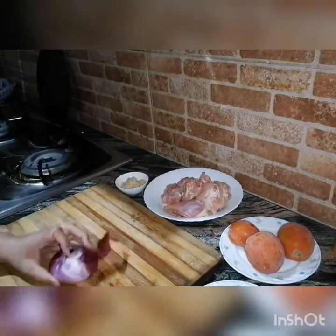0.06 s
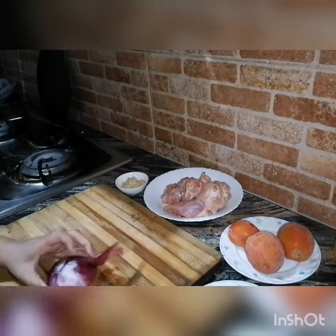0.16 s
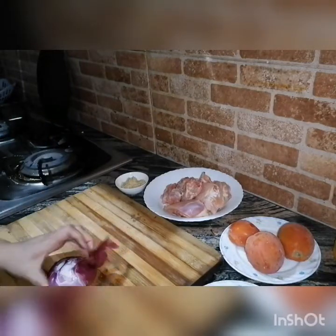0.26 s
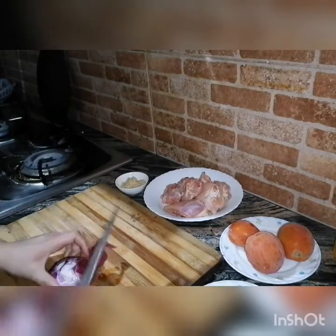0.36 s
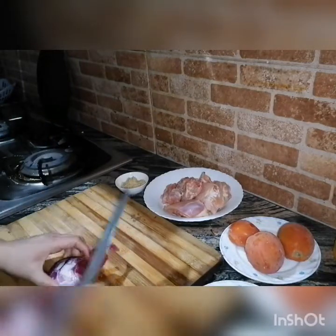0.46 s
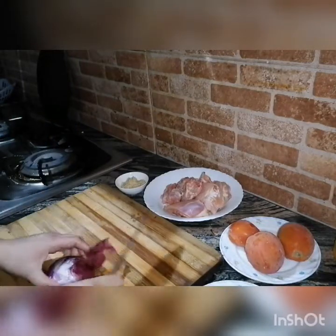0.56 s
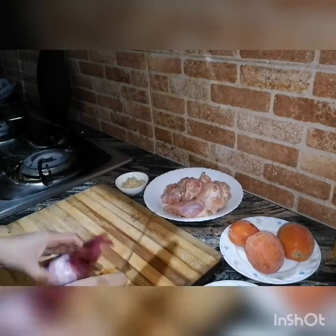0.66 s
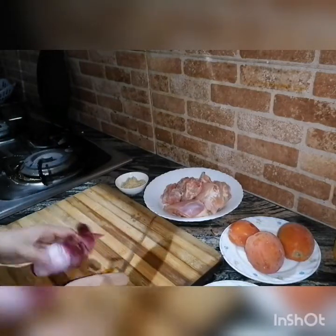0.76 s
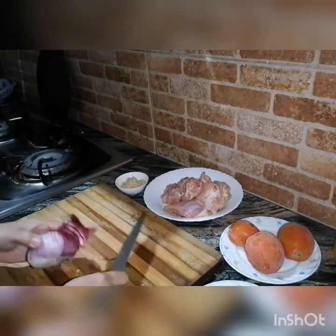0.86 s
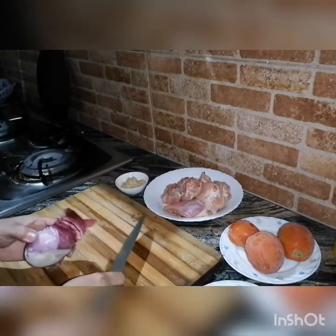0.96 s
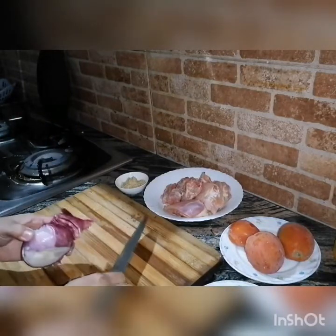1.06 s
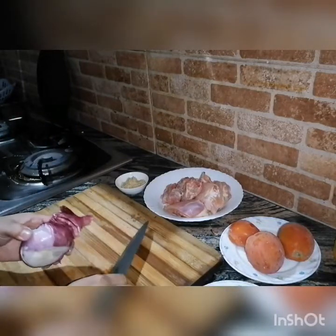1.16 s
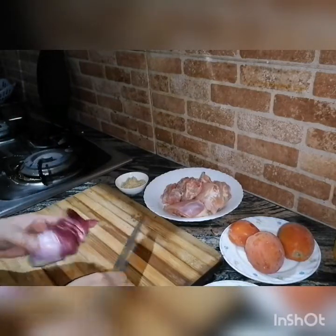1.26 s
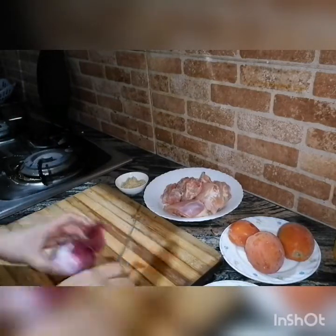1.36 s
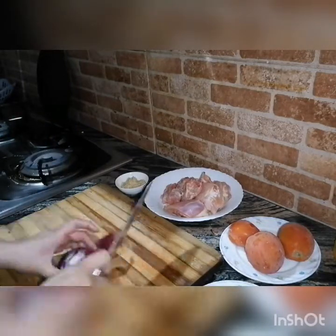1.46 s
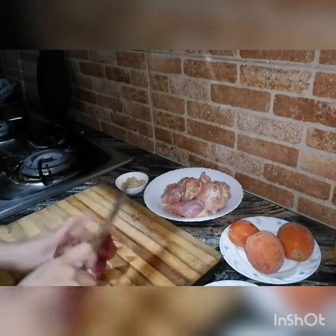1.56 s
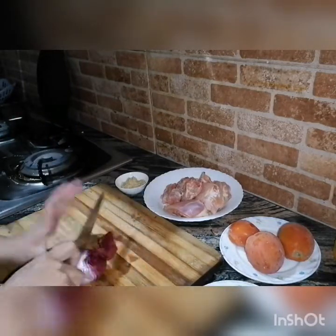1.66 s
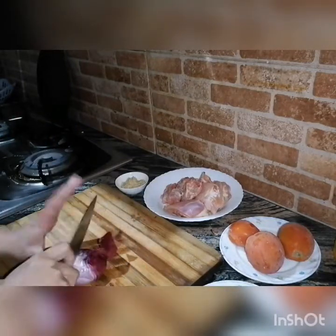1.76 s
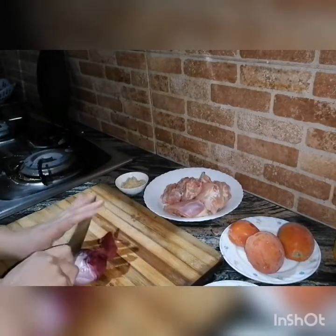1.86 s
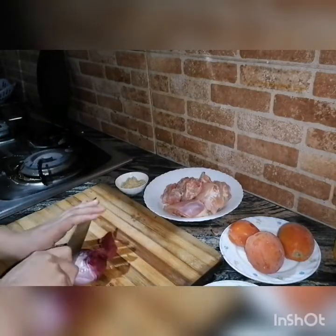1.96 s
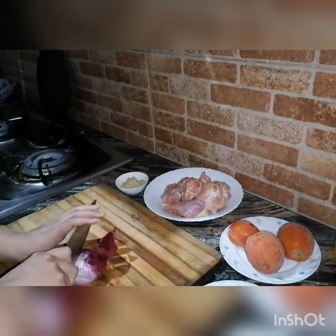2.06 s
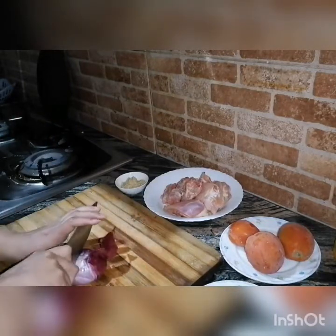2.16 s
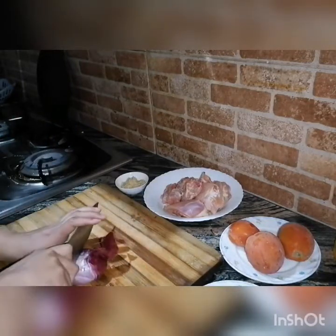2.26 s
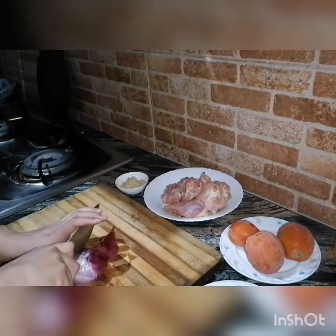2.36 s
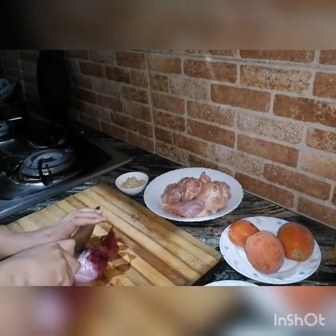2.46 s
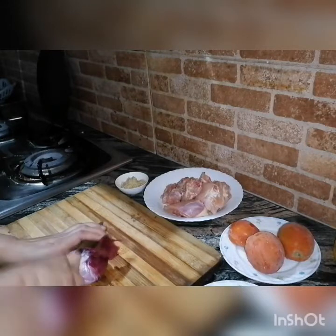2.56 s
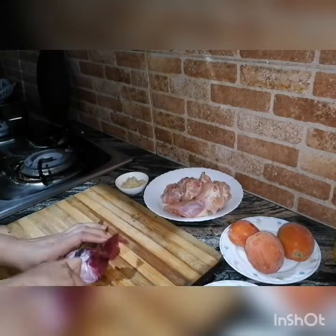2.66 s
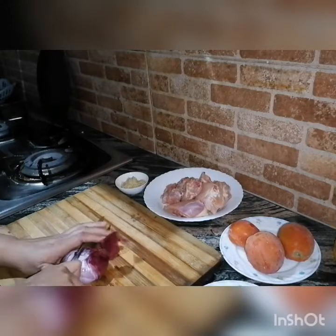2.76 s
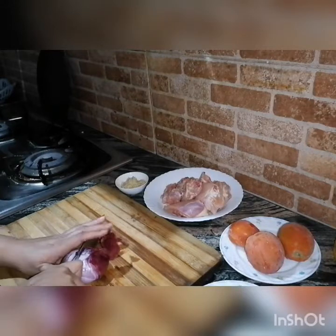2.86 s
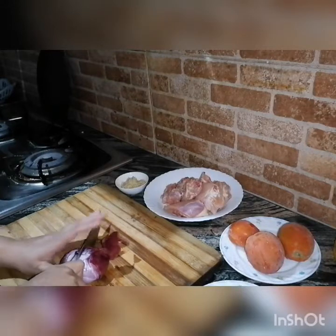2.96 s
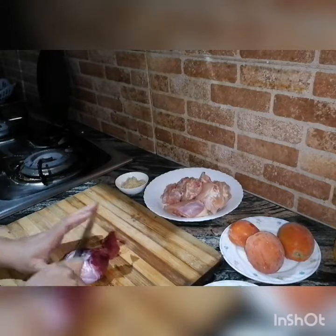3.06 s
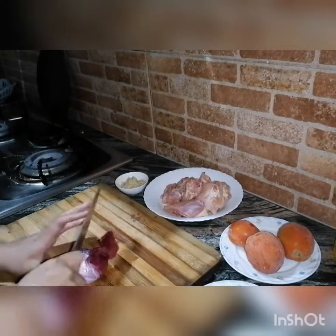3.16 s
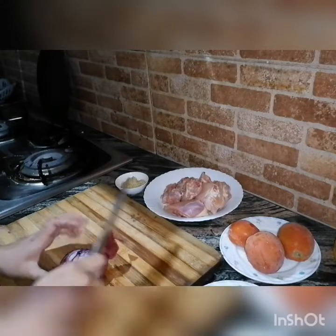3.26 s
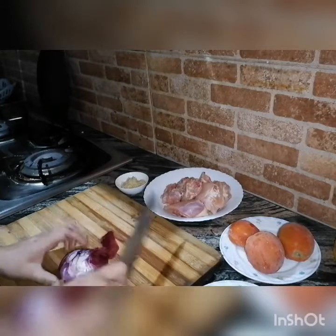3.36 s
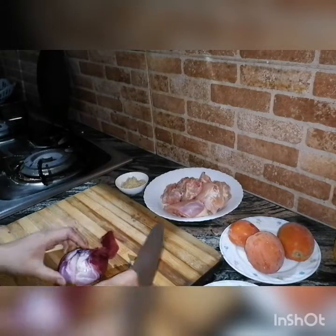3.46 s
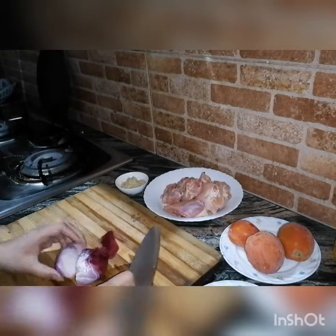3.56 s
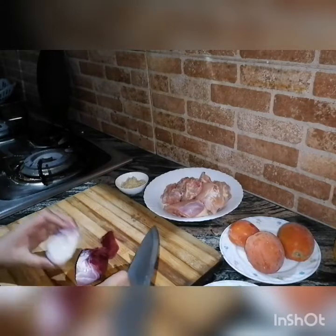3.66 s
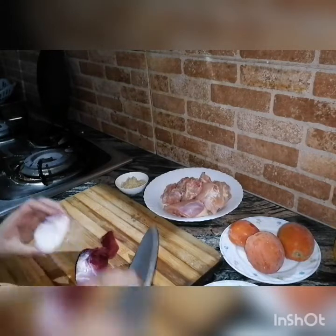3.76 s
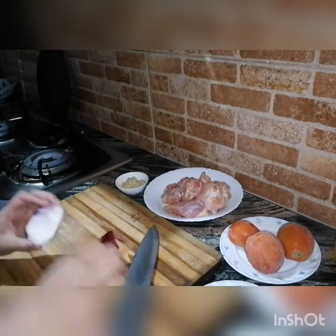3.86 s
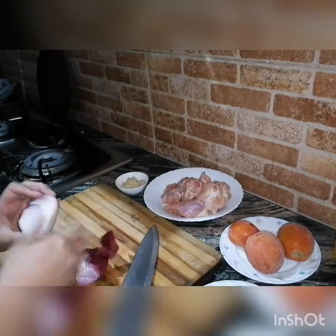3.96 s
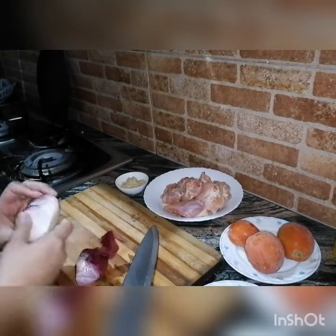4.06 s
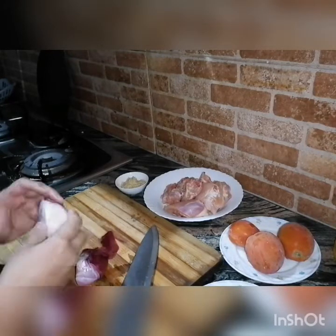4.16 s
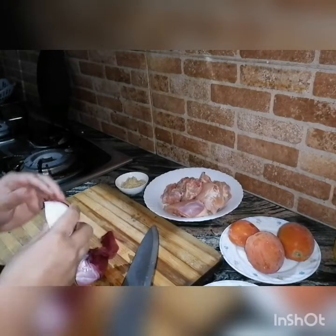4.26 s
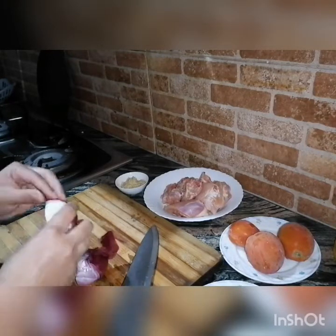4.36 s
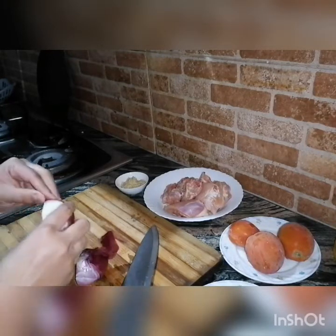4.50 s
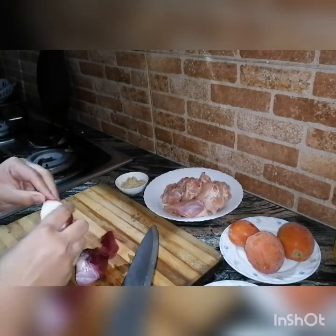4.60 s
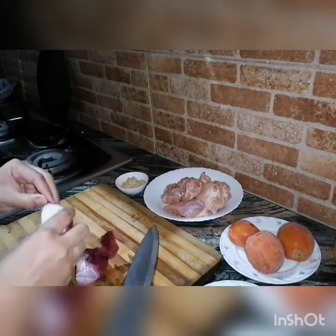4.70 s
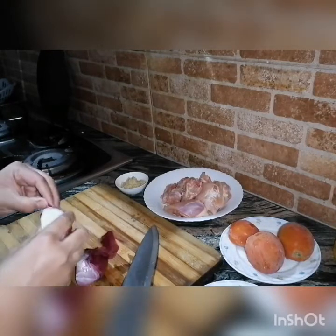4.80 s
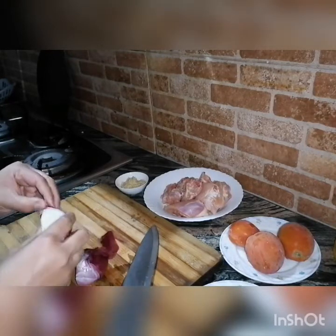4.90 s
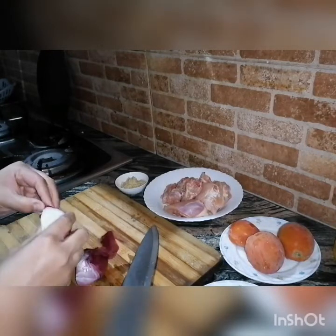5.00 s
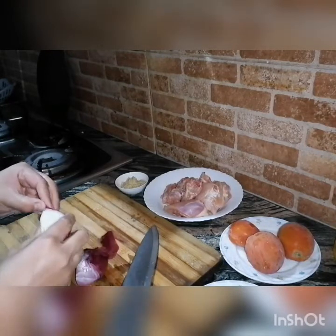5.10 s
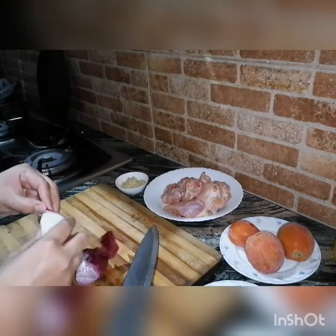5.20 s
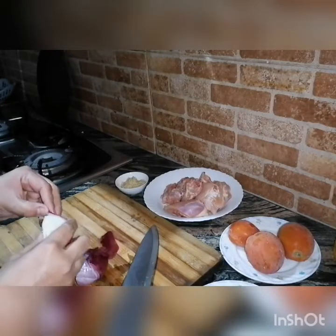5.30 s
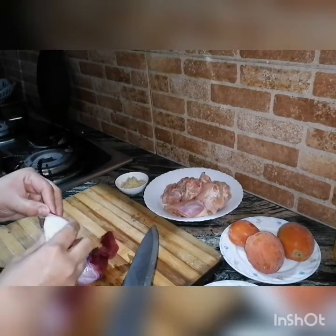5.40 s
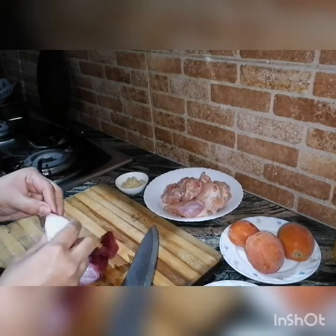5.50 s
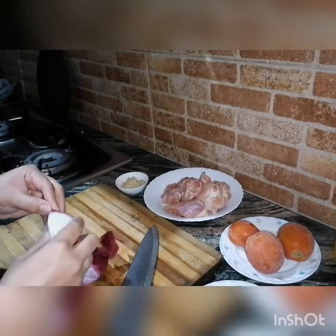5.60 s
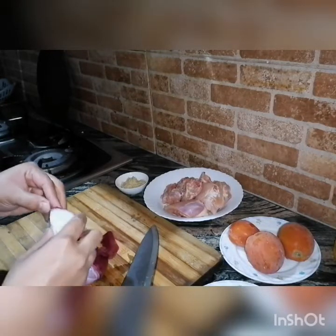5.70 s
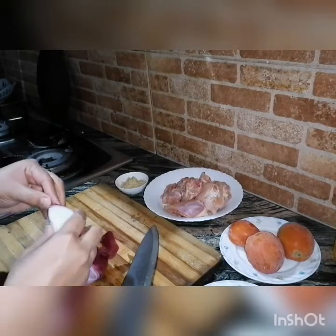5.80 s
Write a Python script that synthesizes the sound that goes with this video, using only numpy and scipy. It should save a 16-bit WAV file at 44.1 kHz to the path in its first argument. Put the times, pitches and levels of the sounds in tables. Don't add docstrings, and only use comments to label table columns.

```python
import sys
import numpy as np
from scipy import signal
from scipy.fft import rfft, irfft, next_fast_len
from scipy.io import wavfile
from scipy.ndimage import uniform_filter1d, map_coordinates

SR = 44100
rng = np.random.default_rng(int(sys.argv[2]) if len(sys.argv) > 2 else 0)


def file_out(sig):
    cols = np.atleast_2d(sig).T
    lim = np.clip(cols, -1, 1)
    pcm = np.round(lim * 32767).astype(np.int16)
    wavfile.write(sys.argv[1], SR, pcm)


def elevation(decibels):
    levels = np.asarray(decibels, float)
    return 10 ** (levels / 20)


N = 257544

# f/Hz, density/dB per Hz
RUMBLE_SPECTRUM = [(12, -32.5), (20, -7.5), (69, 0.5), (140, -10), (239, -10.5), (318, -7), (383, -11.5),
                   (445, -12.5), (492, -3.5), (517, -18.5), (553, -7.5), (633, -24), (1100, -18),
                   (1430, -50), (2420, -120)]
# f/Hz, density/dB per Hz
HISS_SPECTRUM = [(410, -28), (700, -0.5), (985, -3.5), (1280, -8), (1460, -3.5), (1710, -9.5), (2000, -8),
                 (2510, -9.5), (2900, -7), (4070, -16.5), (6120, -10.5), (7270, -6.5), (9090, -19.5),
                 (14800, -18), (16200, -24.5)]
RUMBLE_DB, HISS_DB = -59, -65.5
# f/Hz, level/dB
MOTOR_HUM = [(145.3, -72.5), (199.2, -82.5), (344.5, -91), (441.4, -76.5)]
WHINE_HZ = 498
# f/Hz, correlation/1
ALIKE = [(60, 0.55), (130, 0.93), (290, 0.83), (640, -0.23), (1410, -0.39), (3100, 0.065), (6820, -0.6),
         (15000, -0.01)]
# f/Hz, left-right level/dB
LEAN = [(60, 2.5), (110, -10.5), (200, 3.5), (380, 6), (700, 2.5), (1290, 1.5), (2380, 2.5), (4400, -1.5),
        (8120, 1.5), (15000, -3)]
# t/s, hold/s, level/dB, rise/s, fall/s
SWAYS = [(1.26, 0.056, -58, 0.23, 0.13), (1.88, .04, -62, 0.067, .15)]
SWAY_HZ, SWAY_WIDTH_HZ = 49, 14
# t/s, hold/s, level/dB, rise/s, fall/s
SWEEPS = [(0.0, 0.016, -46.5, .01, 0.14), (2.23, 0.0075, -53, 0.19, 0.22), (2.62, 0, -60, .4, .4)]

# f/Hz, t60/s
KITCHEN_T60 = [(100, 0.22), (300, .5), (700, 0.56), (3000, 0.59), (7000, 0.51), (11000, 0.36),
               (15000, 0.17)]
# f/Hz, width/Hz, added gain/1
ALCOVE = (840, 62, 0.45)
ROOM_ALIKE, ROOM_ALIKE_HZ = 0.4, 700
NEAR_WALL, NEAR_WALL_S, FIRST_ECHO_S = 0.3, 0.015, 0.0013
# t/s, left-right level/dB
PLACE = [(0.0, -3), (0.29, -3.5), (0.52, 3), (0.57, -2.5), (1.84, -6.5), (1.9, -9), (2.32, -7),
         (2.39, -3.5), (4.05, 8), (4.11, 6), (5.58, 3.5), (5.84, 9)]
# t/s, dip/dB, recovery/s
GAIN_DUCKS = [
    (0.0, 3, 1.4),
    (2.608, 11, 4.5),
    (3.9, -3.5, .2),
]
GAIN_ATTACK_S = 0.035
# f/Hz, width/Hz, share removed/1
PORT_DIPS = [(3860, 150, 0.17), (4190, 160, 0.43)]
TOP_HZ = 15950

# f/Hz, width/Hz, level/dB
BOARD = [(509.2, 13, 6.5), (635, 57, 5), (690, 37, -16), (837, 110, 2.5), (825, 26, 5), (950, 13, 0.5)]
# f/Hz, width/Hz, level/dB
CLACK = [(960, 120, 1.5), (1133, 90, 1), (1310, 96, 2), (1450, 120, 2.5), (1578, 140, 2), (1856, 120, 1),
         (2026, 90, -3.5), (2400, 410, -9.5)]
# f/Hz, width/Hz, level/dB
COUNTER = [(134.3, 24, 2), (234, 24, -1.5), (365, 88, 1.5), (413, 30, 0)]
# f/Hz, width/Hz, level/dB
BLADE = [(2002, 200, -4), (2280, 140, 2), (2440, 220, 2), (2675, 150, 2), (2838, 67, 7), (3128, 200, 2.5),
         (3450, 190, 0.5), (4520, 720, -6)]
# f/Hz, width/Hz, level/dB
PRESSED_BLADE = [(1540, 70, -3.5), (2630, 95, -1.5), (3070, 220, 1), (3400, 140, -1), (4650, 1000, -9.5)]
# f/Hz, width/Hz, level/dB
SLIDING_BLADE = [(1570, 39, -0.5), (2640, 90, 0), (6970, 250, -8)]
# f/Hz, level/dB, t60/s
STEEL = [(2826, -36.5, 0.12), (4856, -19, 0.33), (5330, -10, 0.12), (6250, -0.5, 0.04), (6660, -17, 0.16),
         (6918, -41.5, 0.21), (7740, -6, 0.11)]
# f/Hz, density/dB per Hz
SKIN = [(2240, -47), (3800, -6.5), (4960, -2), (5340, 0.5), (6070, -3.5), (6970, 3), (7190, 3), (7480, 0.5),
        (7900, -5), (8400, -14.5), (9800, -24.5), (12700, -49.5), (21600, -120)]
# f/Hz, density/dB per Hz
FIZZ = [(5000, -30.5), (8500, 0), (9700, 0), (11300, 0), (14800, -4.5), (15600, -3.5), (16200, -21.5)]
# f/Hz, level/dB, t60/s
CUPBOARD = [(721, -2, 0.44), (759, -2.5, 0.52), (813, 0, 0.28), (862, -11.5, 0.51)]

# t/s, hold/s, level/dB, rise/s, fall/s
SLIDES = [(.33, 0.24, -72, .05, 0.22)]
# t/s, hold/s, level/dB, rise/s, fall/s
HONES = [(2.3, .12, -67.5, .15, .05), (3.66, .03, -65, .02, .04)]
# t/s, hold/s, level/dB, rise/s, fall/s
SCRAPES = [(0.0, 0.26, -47, .01, 0.029), (.712, 0.016, -61, 0.046, 0.076), (.908, 0.039, -61, 0.03, 0.13),
           (1.115, .01, -68, .03, .03), (1.36, 0, -54.5, 0.038, .04), (1.38, 0.011, -63, .02, 0.17),
           (1.55, 0.076, -54, 0.015, 0.07), (2.05, 0, -64.5, 0.47, 0.046), (2.092, 0, -36, 0.04, 0.028),
           (2.165, 0.063, -48, 0.12, 0.038), (2.26, 0.0013, -35, 0.014, 0.019),
           (2.284, 0.047, -53, .01, 0.3), (2.552, 0.17, -56.5, 0.0066, .005), (3.09, 0.18, -76, .2, 0.065),
           (3.62, 0.048, -70, .005, 0.039), (3.815, 0.0076, -66.5, 0.035, 0.0049),
           (3.86, 0.15, -56.5, .005, 0.022), (4.03, 0, -61, .035, 0.084)]
# t/s, hold/s, level/dB, rise/s, fall/s
TEARS = [(2.594, 0.019, -35.5, 0.0046, 0.0053), (3.186, 0, -75.5, 0.17, 0.033),
         (3.764, 0.0057, -71, 0.0095, 0.027), (4.476, 0.053, -81, 0.13, 0.63),
         (4.745, 0.00055, -68, .05, 0.047), (4.852, 0.00049, -77.5, 0.064, .12),
         (5.15, 0.011, -69, 0.027, 0.054), (5.44, 0.051, -76.5, 0.022, 0.033), (5.3, .19, -79, 0.34, 0.046),
         (5.51, 0, -63, 0.024, 0.034), (5.53, 0, -70.5, 0.0087, 0.056)]
# t/s, hold/s, level/dB, rise/s, fall/s
DRAGS = [(0.0, 0.02, -55.5, .01, 0.097), (.1, 0.15, -60.5, .05, 0.034), (.288, 0.027, -56, 0.0012, 0.0038),
         (.712, 0, -62.5, 0.61, 0.14), (.908, 0, -59, 0.04, .04), (1.36, 0, -37, 0.041, 0.015),
         (2.092, 0.0000086, -45.5, 0.016, 0.045), (2.186, 0, -55.5, 0.15, .15),
         (2.26, 0.013, -50.5, 0.017, 0.064), (2.284, 0.096, -56.5, .01, 0.09),
         (2.592, 0.1, -41.5, 0.0038, 0.071), (3.0, 0.0029, -64.5, .01, 0.14), (3.186, 0, -66.5, 0.1, 0.039),
         (3.63, 0.045, -49, 0.0033, 0.077), (3.815, 0, -56, 0.024, 0.0034),
         (3.87, 0.13, -45.5, 0.026, 0.033), (4.03, 0.029, -52, 0.024, 0.12),
         (4.143, 0.0012, -53.5, .004, 0.049), (4.236, 0.012, -53, 0.02, 0.1),
         (4.476, 0.042, -71, 0.16, 0.99), (5.618, 0, -67, 0.047, 0.072)]
SCRAPE_BLADE_DB, SCRAPE_FIZZ_DB = -11.5, -12.5
TEAR_BLADE_DB, TEAR_FIZZ_DB, DRAG_BLADE_DB = -11, -1.5, -20

# t/s, peak level/dB
SNAPS = [(3.1794, -68), (4.6733, -66), (4.7474, -58), (4.8404, -65), (5.115, -65), (5.155, -55),
         (5.302, -63), (5.3894, -66), (5.4405, -66), (5.5046, -53)]
# t/s, peak level/dB, blade under it/dB, t60/s
CRACKS = [(.0534, -28, -19.5, 0.004), (.058, -34, -24, 0.0091), (.1321, -46, -34, 0.036),
          (.2897, -47, -7, 0.023), (.8889, -49.5, -14, 0.34), (1.1288, -51.5, -2.5, 0.034),
          (1.335, -65, -10, 0.029), (1.354, -50, 3.5, 0.044), (1.365, -48, -10, 0.018),
          (1.8956, -53.5, -70, 0.071), (1.9624, -55, -8.5, 0.033), (2.0687, -41.5, -18.5, 0.017),
          (2.0802, -32, -9, 0.0077), (2.09, -37.5, -12.5, 0.015), (2.095, -34.5, -9.5, 0.016),
          (2.1606, -40, -9.5, 0.022), (2.256, -35.5, -10, .008), (2.2595, -25.5, -12.5, 0.004),
          (2.2635, -33.5, -14, 0.0081), (2.4828, -52, -11, .01), (2.2731, -38.5, -10, 0.018),
          (2.588, -22, -15, 0.011), (2.5905, -16, -14, 0.0067), (2.5965, -24.5, -12.5, 0.011),
          (2.607, -24.5, -13.5, 0.0061), (2.617, -31, -14, 0.0086), (2.6285, -23, 2, 0.0043),
          (2.6347, -32, 4, 0.012), (3.83, -18, -14, 0.016), (3.8363, -24.5, -37.5, 0.018),
          (3.909, -38, -11, .022), (3.9494, -36, -11, 0.023)]
# t/s, peak level/dB, blade under it/dB, t60/s
CLICKS = [(2.6274, -21.5, -10, 0.012), (3.5957, -49.5, -3.5, 0.035), (3.8695, -38.5, -17.5, 0.0087),
          (3.9845, -47, 2, .008), (3.662, -59.5, 0.5, .01), (4.7476, -65, 1, .006),
          (4.178, -62, -22, 0.011), (3.9894, -43.5, -5, 0.014), (4.0337, -43.5, -7.5, 0.029),
          (3.8, -62, -10, .01), (4.141, -48, -8, 0.036), (3.2, -54, -10, 0.011), (5.506, -64.5, -1, 0.0042)]
CRACK_FIZZ_DB, CLICK_FIZZ_DB = -27, -50.5
SNAP_FIZZ_DB, SNAP_BLADE_DB, SNAP_T60_S = -18.5, -16, 0.019
# t/s, peak level/dB
SPIKES = [(.0536, -31), (2.0687, -38), (2.6245, -34), (2.6285, -22), (3.8299, -14), (3.949, -38),
          (4.0339, -40), (4.1407, -42), (4.2365, -51), (5.1552, -60), (5.5038, -54)]
SPIKE_LOW_HZ, SPIKE_HIGH_HZ = 1500, 12000
# t/s, level/dB
KNIFE_RINGS = [(1.355, -47), (1.369, -49), (3.597, -76.5), (3.829, -53)]
# t/s, knock peak level/dB, pitch f/Hz, clack under it/dB
TAPS = [(.002, -43.5, 800, -29), (.052, -45.5, 754, -8), (.719, -59, 662, -10), (1.032, -54, 620, -13),
        (1.25, -48, 650, -20), (3.179, -58.5, 606, -18), (3.638, -41.5, 585, -13), (3.655, -42.5, 900, -11),
        (3.671, -42.5, 630, -16), (3.762, -50, 600, -12), (3.915, -54, 590, -14), (3.953, -36.5, 900, -9.5),
        (3.984, -41.5, 900, -3), (4.032, -45.5, 584, 2), (4.084, -45, 595, -31), (4.14, -51, 955, 5.5),
        (4.146, -45.5, 555, -16.5), (4.177, -43, 577, -13), (4.237, -56.5, 950, 5.5),
        (3.804, -48, 610, -15), (4.281, -48, 602, -22.5)]
# t/s, knock peak level/dB, pitch f/Hz, damping/1 (width over pitch), clack/dB
THUMPS = [(.287, -28, 610, 0.24, -42), (.2915, -29.5, 620, 0.5, -13.5), (1.527, -24.5, 580, 0.34, -26),
          (1.538, -30, 556, 0.23, -48), (1.53, -38, 150, .12, -40), (1.13, -46, 150, .12, -40),
          (2.59, -27, 656, 0.42, -2.5), (3.83, -36, 504, 0.34, -17.5)]
# t/s, knock peak level/dB, pitch f/Hz, damping/1 (width over pitch), clack/dB
CHOPS = [(1.127, -27.5, 602, 0.19, -16.5), (1.133, -28, 776, 0.48, -23), (1.141, -33, 630, 0.59, -17.5),
         (1.335, -50, 810, 0.42, -10), (1.343, -46, 760, .4, -8), (1.354, -36, 715, 0.61, -12),
         (2.257, -36, 730, 0.47, -24), (2.6278, -25, 660, 0.2, 5), (2.6335, -22, 870, 0.34, -10.5),
         (3.598, -39.5, 610, 0.3, -7), (3.8275, -30, 612, 0.23, -5), (3.8295, -29, 661, 0.43, -1.5),
         (3.836, -33, 625, 0.12, -4)]
FLESH_HZ = 950
THUMP_THUD_DB, CHOP_THUD_DB, TAP_THUD_DB = -7, -35.5, -18
TAP_DAMPING = 0.31
# t/s, peak level/dB, pitch f/Hz, pressed/s, t60 after/s
SLAMS = [
    (2.6277, -14, 800, .0035, .008),
    (3.5975, -36, 614, .014, 0.024),
]
# t/s, level/dB
BOOMS = [(2.632, -36)]


def unit(x):
    return x / np.sqrt(np.mean(x ** 2) + 1e-20)


def peak(x):
    return x / np.max(np.abs(x))


def both(a_db, b_db):
    return 10 * np.log10(elevation(a_db) ** 2 + elevation(b_db) ** 2)


def along(points, hz):
    f, value = np.transpose(points)
    return np.interp(np.log(hz + 1), np.log(f + 1), value)


def wobble(rate):
    knots = rng.standard_normal(int(N * rate / SR) + 4)
    return map_coordinates(knots, [np.arange(N) * rate / SR])


def filtered(x, response):
    m = next_fast_len(x.shape[-1] + 8192)
    spectrum = rfft(x, m) * response(np.fft.rfftfreq(m, 1 / SR))
    return irfft(spectrum, m)[..., :x.shape[-1]]


def modes_at(f, centre, width):
    return 1j * f * width / (centre ** 2 - f * f + 1j * f * width)


def modes(table, spread_db=0):
    gains = [elevation(db + luck) for (_, _, db), luck in zip(table, rng.normal(0, 1, len(table)) * spread_db)]

    def response(f):
        return sum((-1) ** k * gains[k] * modes_at(f, centre, width)
                   for k, (centre, width, _) in enumerate(table))
    return response


def colour(spectrum):
    return lambda hz: elevation(along(spectrum, hz))


def strokes(rows):
    t = np.arange(N) / SR
    power = 1e-14
    for start, hold, db, rise, fall in rows:
        away = np.maximum((start - t) / rise, (t - start - hold) / fall)
        power = power + elevation(db - 20 * np.clip(away, 0, 8)) ** 2
    return 10 * np.log10(power)


def gain_db():
    total = np.zeros(N)
    for start, dip_db, recovery in GAIN_DUCKS:
        t = np.maximum(np.arange(N) / SR - start, 0)
        total -= dip_db * (1 - np.exp(-t / GAIN_ATTACK_S)) * np.exp(-t / recovery)
    return total


def hands_pan_db():
    return np.interp(np.arange(N) / SR, *np.transpose(PLACE))


def placed(x, pan_db, lag_s):
    late = filtered(x, lambda hz: np.exp(-2j * np.pi * hz * lag_s))
    return np.array([x * elevation(pan_db / 2), late * elevation(-pan_db / 2)])


def kitchen(x, length):
    hz, t, z = signal.stft(rng.standard_normal((2, 30000)), SR, nperseg=256)
    shared = ROOM_ALIKE / (1 + (hz[:, None] / ROOM_ALIKE_HZ) ** 2)
    common = np.sqrt(shared) * (z[0] + z[1]) / np.sqrt(2)
    z = common + np.sqrt(1 - shared) * z * np.array([[[1]], [[1j]]])
    decay = elevation(-60 * t / along(KITCHEN_T60, hz)[:, None])
    tail = signal.istft(z * decay, SR, nperseg=256)[1]
    t = np.arange(tail.shape[1]) / SR
    onset = 1 - np.exp(-(t / FIRST_ECHO_S) ** 2)
    tail = tail * onset * (1 + NEAR_WALL * np.exp(-t / NEAR_WALL_S))
    centre, width, lift = ALCOVE
    tail = filtered(tail, lambda f: 1 + lift * modes_at(f, centre, width))
    return signal.fftconvolve(x[None], tail / np.linalg.norm(tail[0]), axes=1)[:, :length]


def strike(rows, sound, wet_db, gate_db):
    out, wet = np.zeros((2, N + SR)), np.zeros((2, N + SR))
    pan_db = hands_pan_db()
    for start, *how in rows:
        dry, at = sound(*how), round(start * SR)
        out[:, at:at + len(dry)] += placed(dry, pan_db[at], lag_s=0.00013)
        tail_pan = elevation(pan_db[at] * np.array([[0.25], [-0.25]]))
        wet[:, at:at + 30000] += elevation(wet_db) * kitchen(dry, 30000) * tail_pan
    out, wet = out[:, :N], wet[:, :N]
    power = np.abs(uniform_filter1d(np.mean(wet ** 2, axis=0), size=1300)) + 1e-20
    gate = 1 / (1 + (elevation(gate_db + gain_db()) ** 2 / power) ** 2)
    return out + wet * gate


def rush(spectrum):
    def mid_side(hz):
        turn = np.arccos(along(ALIKE, hz)) / 2
        return colour(spectrum)(hz) * np.array([np.cos(turn), np.sin(turn)])

    def lean(hz):
        return elevation(along(LEAN, hz) * np.array([[0.5], [-0.5]]))

    mid, side = filtered(rng.standard_normal((2, N)), mid_side)
    return unit(filtered(np.array([mid + side, mid - side]), lean))


def motor():
    t = np.arange(N) / SR
    hum = 0
    for hz, db in MOTOR_HUM:
        hum = hum + elevation(db + 64.5 + 1.2 * wobble(8.1)) * np.sin(2 * np.pi * hz * t + 0.5 * wobble(27))
    whine = elevation(-3 + 2.5 * wobble(10)) * np.sin(2 * np.pi * WHINE_HZ * t + 0.5 * wobble(6))
    return (hum + elevation(-1.5) * whine) * elevation([[2.5], [-2.5]])


def background():
    rumble_db = RUMBLE_DB + gain_db()
    hiss_db = both(HISS_DB + gain_db(), strokes(SWEEPS))
    swell_db = 1.3 * wobble(8)
    low = elevation(-1.5 + swell_db) * rush(RUMBLE_SPECTRUM) + motor()
    sway = unit(filtered(rng.standard_normal(N), lambda f: modes_at(f, SWAY_HZ, SWAY_WIDTH_HZ) ** 2))
    return elevation(strokes(SWAYS)) * sway + elevation(rumble_db) * low + elevation(hiss_db - 1.5) * rush(HISS_SPECTRUM)


def boom(ring_db):
    t = np.arange(24000) / SR
    ring = sum(elevation(db - 60 * t / t60) * np.sin(2 * np.pi * (hz * t + rng.random()))
               for hz, db, t60 in CUPBOARD)
    return elevation(ring_db) * ring * (1 - np.exp(-t / 0.027))


def grains(rate, spread_db):
    size = np.minimum(rng.exponential(1, N), 3.5)
    slipping = rng.random(N) < rate / SR
    slips = slipping * elevation(spread_db * size) * np.tanh(rng.standard_normal(N))
    return unit(slips) + 0.73 * rng.standard_normal(N)


def shaken(slips, level_db, response):
    norm = np.sqrt(np.mean(filtered(slips, response) ** 2))
    return filtered(slips * elevation(level_db), response) / norm


def sliding():
    slips = grains(rate=900, spread_db=3)
    slide = shaken(slips, strokes(SLIDES), modes(SLIDING_BLADE))
    hone = shaken(slips, strokes(HONES), modes(SLIDING_BLADE[:1]))
    dry = slide + hone
    return placed(dry, hands_pan_db(), lag_s=0.00013) + elevation(-6.5) * kitchen(dry, N)


def rubbing():
    scrape_db, tear_db, drag_db = strokes(SCRAPES), strokes(TEARS), strokes(DRAGS)
    rustle_db = both(scrape_db, tear_db)
    fizz_db = both(scrape_db + SCRAPE_FIZZ_DB, tear_db + TEAR_FIZZ_DB)
    blade_db = both(scrape_db + SCRAPE_BLADE_DB, tear_db + TEAR_BLADE_DB)
    blade_db = both(blade_db, drag_db + DRAG_BLADE_DB)
    clumps_db = 1.5 * wobble(80)
    slips = grains(rate=3500, spread_db=1.5)
    skin = shaken(slips, rustle_db + clumps_db - 3.5, colour(SKIN))
    fizz = shaken(slips, fizz_db + clumps_db - 3.5, colour(FIZZ))
    blade = shaken(grains(rate=680, spread_db=6.5), blade_db + clumps_db - 4.5, modes(PRESSED_BLADE))
    drags = grains(rate=700, spread_db=2.5)
    drag = shaken(drags, drag_db - 4.5, modes(BOARD)) + shaken(drags, drag_db - 14.5, modes(CLACK))
    drag = filtered(drag, lambda f: 1 / (1 + 1j * f / 3000) ** 2)
    dry = skin + fizz + blade + drag
    return placed(dry, hands_pan_db(), lag_s=0.00014) + elevation(-7.5) * kitchen(dry, N)


def burst(t60):
    t = np.arange(6144) / SR
    snap = rng.standard_normal(len(t)) + 3 * (t == t[4])
    z = rfft(snap * elevation(-60 * t / t60))
    even = irfft(z / np.sqrt(uniform_filter1d(np.abs(z) ** 2, size=13)))
    return even * elevation(-60 * (t / (1.8 * t60)) ** 2)


def tick(crack_db, blade_db, fizz_db, t60):
    snap = burst(t60 + 0.0062)
    crack = elevation(crack_db) * peak(filtered(snap, colour(SKIN)))
    fizz = elevation(fizz_db + 17) * peak(filtered(snap, colour(FIZZ)))
    blade = elevation(blade_db + 4.5) * peak(filtered(snap, modes(BLADE)))
    return crack + fizz + blade


def spike(peak_db):
    click = 1.0 * (np.arange(2048) == 2)
    band = lambda f: 1j * f / (SPIKE_LOW_HZ + 1j * f) / (1 + 1j * f / SPIKE_HIGH_HZ)
    return -elevation(peak_db) * peak(filtered(click, band))


def steel(ring_db):
    t = np.arange(8000) / SR
    longest_s = 0.18
    ring = 0
    for hz, db, t60 in STEEL:
        level_db = ring_db + db + rng.normal(0, 3)
        ring = ring + elevation(level_db - 60 * t / min(t60, longest_s)) * np.sin(2 * np.pi * hz * t)
    return ring


def slam(peak_db, hz, pressed, t60):
    t = np.arange(6144) / SR
    shape = (1 - np.exp(-t * hz / 0.15)) * elevation(-60 * np.maximum(t - pressed, 0) / t60)
    return -elevation(peak_db) * shape * np.sin(2 * np.pi * hz * t)


def knock(knock_db, hz, damping, thud_db, clack_db):
    t = np.arange(6144) / SR
    contact = 0.12 / hz
    push = np.exp(-0.5 * (t / contact - 3) ** 2)
    spot, board, counter = modes([(hz, hz * damping, 0)]), modes(BOARD, spread_db=1), modes(COUNTER)

    def wood_response(f):
        radiated = (1j * f / (300 + 1j * f)) ** 2
        radiated = radiated / (1 - (f / 1150) ** 2 + 1.2j * f / 1150)
        return (spot(f) + elevation(-3) * damping / 0.65 * board(f)) * radiated

    wood = filtered(push, wood_response)
    thud = filtered(push, lambda f: counter(f) * (1j * f / (95 + 1j * f)) ** 2)
    thud = thud * np.cos(np.pi / 2 * t / t[-1]) ** 2
    clack = filtered(burst(0.018), modes(CLACK, spread_db=4))
    return elevation(knock_db) * peak(wood) + elevation(thud_db + 3) * peak(thud) + elevation(clack_db + 3) * peak(clack)


def crunches():
    ticks = [(s, db, db + SNAP_BLADE_DB, db + SNAP_FIZZ_DB, SNAP_T60_S) for s, db in SNAPS]
    for rows, fizz in ((CRACKS, CRACK_FIZZ_DB), (CLICKS, CLICK_FIZZ_DB)):
        ticks += [(s, db, db + blade, db + fizz, t60) for s, db, blade, t60 in rows]
    return strike(ticks, tick, wet_db=-2, gate_db=-69.5)


def blows():
    soft = [(s, db, hz, damp, db + THUMP_THUD_DB, db + clack) for s, db, hz, damp, clack in THUMPS]
    hard = [(s, db, hz, damp, db + CHOP_THUD_DB, db + clack) for s, db, hz, damp, clack in CHOPS]
    hard += [(s, db, hz, TAP_DAMPING, db + TAP_THUD_DB, db + clack) for s, db, hz, clack in TAPS]
    flesh = lambda f: -elevation(-3) / (1 - (f / FLESH_HZ) ** 2 + 0.9j * f / FLESH_HZ) ** 2
    thumps = filtered(strike(soft, knock, wet_db=-3.5, gate_db=-54), flesh)
    return thumps + strike(hard, knock, wet_db=-2.5, gate_db=-59)


def scene():
    mix = background() + strike(BOOMS, boom, wet_db=-4.5, gate_db=-60)
    mix += sliding() + rubbing() + crunches()
    mix += strike(SPIKES, spike, wet_db=-9, gate_db=-70)
    mix += strike(KNIFE_RINGS, steel, wet_db=-7.5, gate_db=-98)
    mix += strike(SLAMS, slam, wet_db=-7, gate_db=-60.5)
    return mix + blows()


def low_pass(x):
    return signal.sosfilt(signal.butter(12, 16460, fs=SR, output="sos"), x)


def record(dry):
    def port(hz):
        dips = [1 - share * modes_at(hz, centre, width) for centre, width, share in PORT_DIPS]
        return np.prod(dips, axis=0) / (1 + (hz / TOP_HZ) ** 60)

    return low_pass(filtered(dry, port))


dry = scene()
out = record(dry)
file_out(out)
```